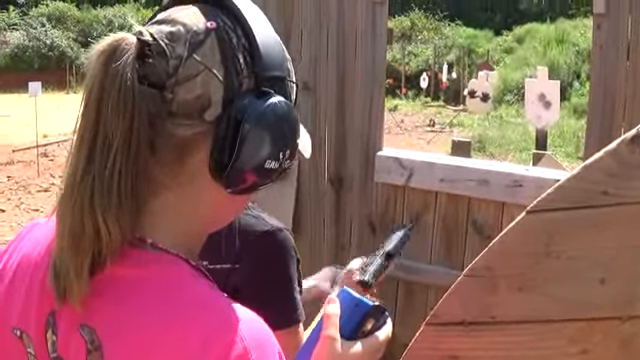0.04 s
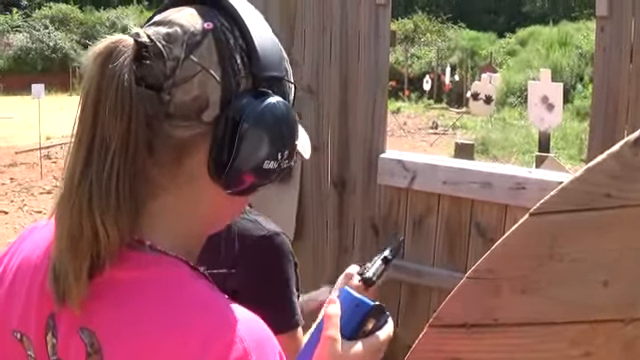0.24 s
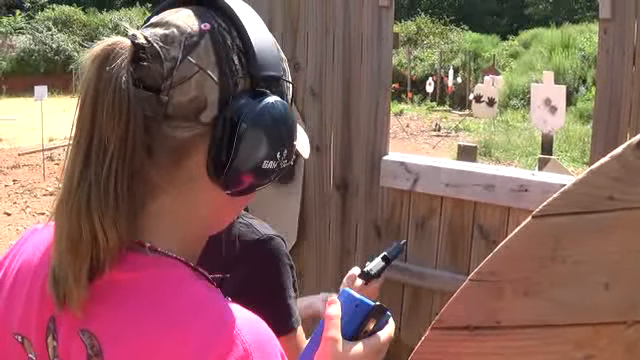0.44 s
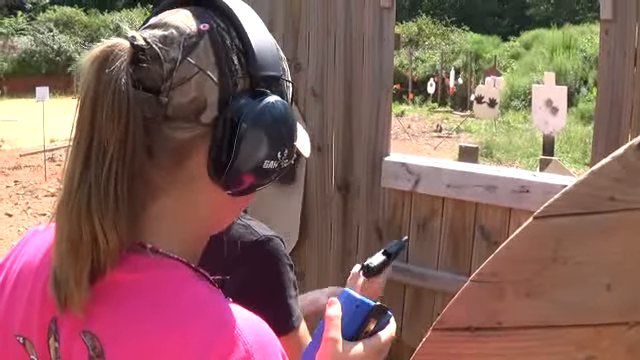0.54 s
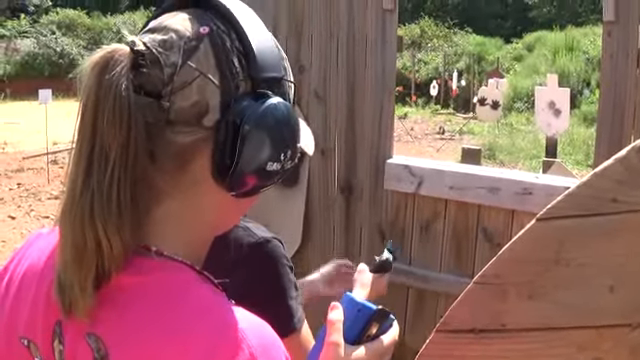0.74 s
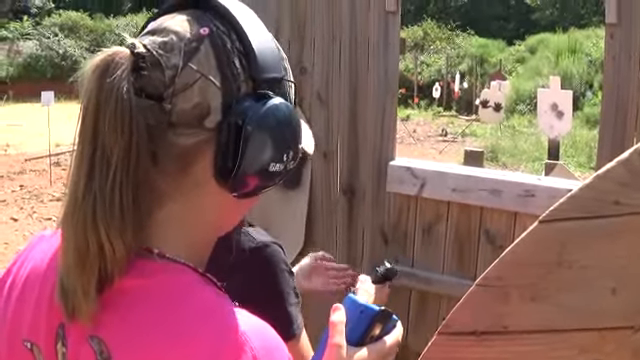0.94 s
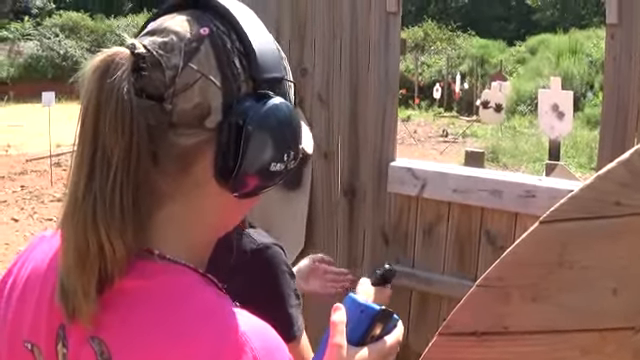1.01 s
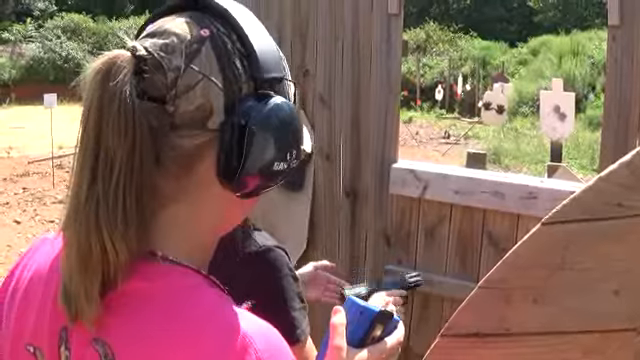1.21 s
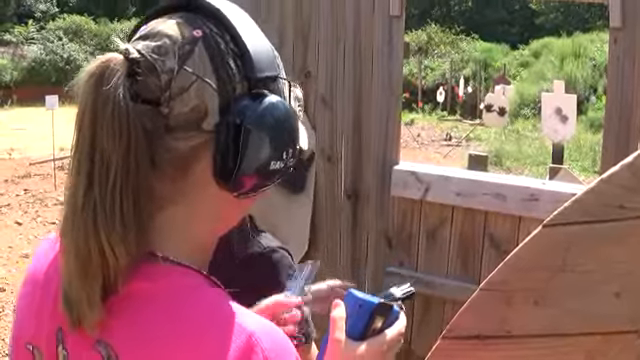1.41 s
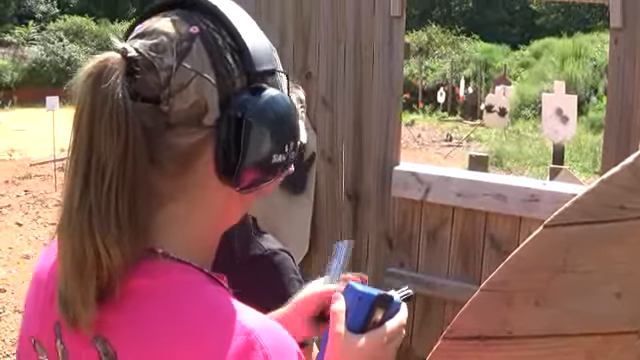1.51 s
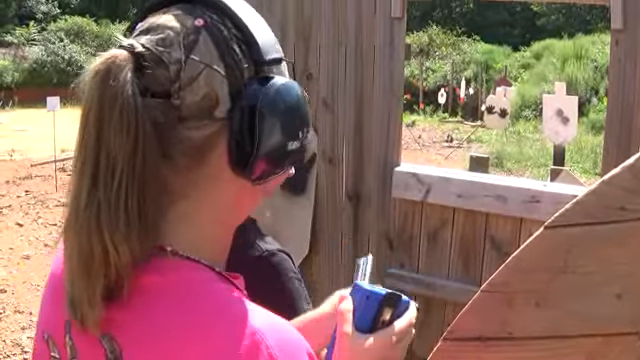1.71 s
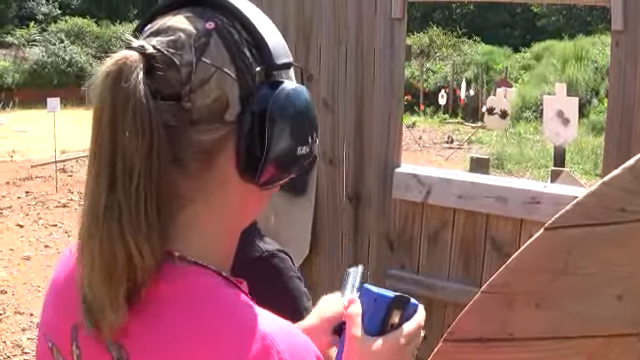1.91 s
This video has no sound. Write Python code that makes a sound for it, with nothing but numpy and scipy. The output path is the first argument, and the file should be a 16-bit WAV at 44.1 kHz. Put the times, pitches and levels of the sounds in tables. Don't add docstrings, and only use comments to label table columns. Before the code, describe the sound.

A pistol's action snaps shut at about 0.2 seconds: a tight cluster of steel clicks with a hollow knock, lasting under 0.05 seconds, then a short scattered reflection from wooden planks. Quiet summer air, steady insect hiss and rustling leaves continue, with a faint low engine hum swelling around 0.3 to 0.6 and soft wind bumps near 0.9 and 1.9. Very faint handling taps come at 1.35, 1.57 and 1.8.

```python
import sys
import numpy as np
from scipy import signal
from scipy.fft import rfft, irfft
from scipy.io import wavfile
from scipy.ndimage import uniform_filter1d

SR = 44100
rng = np.random.default_rng(int(sys.argv[2]) if len(sys.argv) > 2 else 0)


def volts(x):
    e = np.asarray(x, float) / 20
    return 10 ** e


def dump_mix(stems):
    frames = np.atleast_2d(stems).T
    limited = np.clip(frames, -1, 1)
    pcm = np.round(limited * 32767).astype(np.int16)
    wavfile.write(sys.argv[1], SR, pcm)


N = 85995


def evened(x):
    return x / np.sqrt(np.mean(x ** 2) + 1e-20)


def read(points, hz):
    f, value = np.transpose(points)
    return np.interp(np.log(hz + 1), np.log(f + 1), value)


def colour(x, points):
    hz = np.fft.rfftfreq(x.shape[-1], 1 / SR)
    return irfft(rfft(x) * volts(read(points, hz)), x.shape[-1])


def add(mix, s, sound):
    part = mix[round(s * SR):][:len(sound)]
    part += sound[:len(part)]


def ring(modes, spread_db=0., scatter=0.):
    t = np.arange(8000) / SR
    hz, db, t60 = np.transpose(modes)[:, :, None]
    db = db + spread_db * rng.standard_normal(db.shape)
    phase = scatter * 2 * np.pi * rng.random(db.shape)
    fade = volts(db - 60 * t / np.maximum(t60, .002))
    return (fade * np.sin(2 * np.pi * hz * t + phase)).sum(0)


def brighter(db, hz, bright_db):
    return db + bright_db * np.log2(hz / 4300)


# f/Hz, level/dB, time to fall by 60 dB/s
STEEL_MODES = [(1080, -6.5, 0.031), (1410, -8.5, 0.024), (1773, -12, 0.032), (2433, 0, 0.026),
               (2623, -5, 0.041), (2838, -7, 0.12), (2910, -2.5, 0.038), (3270, -3, 0.026),
               (4085, -4, 0.033), (4640, -5.5, 0.024), (5380, -4, 0.016), (7010, -3, 0.013),
               (8630, -9, 0.016), (10580, -11, 0.0089)]


def steel_ring(bright_db):
    modes = []
    for hz, db, t60 in STEEL_MODES:
        detuned_hz = hz * (1 + .03 * rng.standard_normal())
        modes.append((detuned_hz, brighter(db, hz, bright_db), t60))
    rise = np.minimum(np.arange(8000) / (.0003 * SR), 1)
    return ring(modes, spread_db=3.0, scatter=0.94) * rise


# f/Hz, level/dB
CRACK_TONE = [(200, -34), (450, -33), (1050, -5), (2900, 2.5), (4500, 1), (9000, -4.5), (12500, -9),
              (14000, -36)]


def crack(db, t60, bright_db=0):
    t = np.arange(2000) / SR
    tone = [(hz, brighter(level, hz, bright_db)) for hz, level in CRACK_TONE]
    return colour(rng.standard_normal(len(t)), tone) * volts(db - 60 * t / t60)


# t/s, level/dB, brightness/dB per octave
STRIKES = [(.2131, -38, -3), (.2150, -23, -3), (.2174, -24, 0), (.2205, -16, 2), (.2212, -12, 2),
           (.2220, -15, -1), (.2243, -17, -1), (.2271, -18, 0), (.2286, -17, -1), (.2321, -16, 2),
           (.2332, -16, 1), (.2352, -19, 1), (.2392, -22, 0), (.2442, -23, -1), (.2510, -26, -1),
           (.2582, -24, -2), (.318, -42, 3)]


def steel_strikes():
    out = np.zeros(N)
    for s, db, bright_db in STRIKES:
        add(out, s, volts(db - 13) * steel_ring(bright_db))
        add(out, s, volts(db) * crack(1.5, .014, bright_db))
    return out


# f/Hz, level/dB, time to fall by 60 dB/s
FRAME_MODES = [(338, -31, 0.16), (710, -1, 0.0043), (580, -28, 0.056), (750, -31, 0.048),
               (1700, -10.5, 0.0034)]


def frame_knock():
    out = np.zeros(N)
    knock_s, pull_s = .21565, .0005
    knock_db, pull_db = -8, -6
    add(out, knock_s, volts(knock_db) * ring(FRAME_MODES))
    add(out, knock_s - pull_s, -volts(knock_db + pull_db) * ring(FRAME_MODES))
    return out


# t/s, level/dB, f/Hz, time to fall by 60 dB/s
TAPS = [
    (1.346, -41, 2300, .018),
    (1.347, -42, 3600, .012),
    (1.571, -43, 2930, .032),
    (1.468, -47, 1700, .012),
    (1.815, -46, 1500, .02),
    (1.852, -50, 3750, .025),
]


def handling_taps():
    out = np.zeros(N)
    for s, db, hz, t60 in TAPS:
        note = ring([(hz, 0, t60)])[:2000]
        add(out, s, volts(db) * (note + crack(-3, .03)))
    return out


def pistol():
    out = steel_strikes() + frame_knock() + handling_taps()
    return signal.sosfilt(signal.butter(4, [150, 13500], "band", fs=SR, output="sos"), out)


# f/Hz, time to fall by 60 dB/s
BOOTH_FADE = [(250, 0.15), (700, 0.22), (2500, 0.17), (5000, 0.13), (12000, 0.13)]
# f/Hz, level/dB
BOOTH_SIDE = [(200, -36), (700, -13.5), (2500, -9), (4500, -10), (7000, -5), (12000, -39)]


def booth(x):
    taps = np.zeros((2, 22000))
    at = np.arange(0, 21980, 20) + rng.integers(0, 20, (2, 1099))
    np.put_along_axis(taps, at, rng.choice([-1., 1.], at.shape), 1)
    hz, t, z = signal.stft(taps, SR, nperseg=256)
    fade = volts(-60 * t / read(BOOTH_FADE, hz)[:, None])
    tail = signal.istft(z * fade, SR, nperseg=256)[1]
    tail = tail / np.linalg.norm(tail[0])
    tail = np.pad(tail, ((0, 0), (round(.003 * SR), 0)))
    wet = signal.fftconvolve(x[None], tail, axes=1)[:, :N]
    return np.array([volts(-7) * wet[0], colour(wet[1], BOOTH_SIDE)])


# f/Hz, level/dB
AIR = [(30, -3), (55, -5), (200, -2), (500, -7.5), (3000, -11), (5300, -17), (13000, -16.5), (15300, -29)]
# f/Hz, level/dB
WIDE = [(60, -24), (130, -17.5), (290, -9), (640, -4.5), (1400, -5), (3090, -5), (6800, -6.5),
        (15000, -8.5)]
# t/s, level/dB
LEAVES = [
    (0, -24),
    (.9, -18.5),
    (1.3, -23),
    (1.95, -75),
]


def outdoors():
    frames, hz = N // 256 + 5, np.fft.rfftfreq(1024, 1 / SR)[:, None]
    a, b, c, d, patches = rng.standard_normal((frames, 513, 5)).T
    patches = uniform_filter1d(patches, size=10, axis=0)
    patches = evened(uniform_filter1d(patches, size=12, axis=1))
    t = np.arange(frames) * 256 / SR

    insect_lo_hz, insect_hi_hz, insect_edge_hz = 6660, 8300, 285
    above_low = 1 / (1 + np.exp((insect_lo_hz - hz) / insect_edge_hz * 2))
    below_high = 1 / (1 + np.exp((hz - insect_hi_hz) / insect_edge_hz))
    insects = volts(-7) * above_low * below_high

    leaves_hz, leaves_octaves = 11700, 0.9
    leaf_tone = np.exp(-(np.log2((hz + 1) / leaves_hz) / leaves_octaves) ** 2)
    leaves = volts(np.interp(t, *np.transpose(LEAVES))) * leaf_tone

    size = np.sqrt(volts(read(AIR, hz)) ** 2 + insects ** 2 + leaves ** 2) * volts(0.55 * patches)
    z = np.array([a + 1j * b, (c + 1j * d) * volts(read(WIDE, hz))]) * size
    both = signal.istft(z, nperseg=1024, noverlap=768)[1][:, :N]
    return volts(-47) * both / np.std(both[0])


# t/s, level/dB
DRONE = [
    (0, -61),
    (.2, -73),
    (.32, -49.5),
    (.45, -65),
    (.58, -54.5),
    (.8, -63),
    (1, -74),
    (1.95, -87),
]


def drone():
    note_hz, width_hz = 186, 18
    r = np.exp(-np.pi * width_hz / SR)
    slow = signal.lfilter([1 - r], [1, -r], rng.standard_normal(N) + 1j * rng.standard_normal(N))
    t = np.arange(N) / SR
    hum = evened((slow * np.exp(2j * np.pi * note_hz * t)).real)
    return volts(np.interp(t, *np.transpose(DRONE))) * hum


# t/s, length/s, f/Hz, level/dB
BUMPS = [
    (0.87, 0.15, 57, -53.5),
    (1.86, 0.076, 97, -52),
    (1.62, 0.079, 390, -56),
    (1.05, 0.042, 430, -53),
]


def wind():
    out = np.zeros(N)
    for s, length, hz, db in BUMPS:
        t = np.arange(0, length, 1 / SR)
        swell = np.sin(np.pi * t / length) ** 2
        add(out, s, volts(db) * swell * np.sin(2 * np.pi * hz * t))
    return out


def scene():
    gun = pistol()
    mid, side = outdoors() + booth(gun)
    mid = mid + gun + drone() + wind()
    side = side - 0.029 * mid
    return np.array([mid + side, mid - side])


def roll_off(x):
    return signal.sosfilt(signal.butter(12, 15400, fs=SR, output="sos"), x)


# t/s, f/Hz
FOLD = [(0, 13000), (.13, 4200), (.24, 4800), (.35, 12500), (.6, 9500), (.71, 13500), (.79, 4200),
        (.88, 8200), (.94, 4200), (1.03, 4200), (1.11, 9500), (1.19, 4200), (1.3, 8500), (1.39, 13000),
        (1.48, 4300), (1.57, 12500), (1.8, 10500), (1.95, 12500)]


def record(dry):
    mid, side = (dry[0] + dry[1]) / 2, (dry[0] - dry[1]) / 2
    hz, t, z = signal.stft(side, SR, nperseg=2048, noverlap=1024)
    top_hz = np.interp(t, *np.transpose(FOLD)) * (1 + .2 * rng.standard_normal(len(t)))
    side = signal.istft(z * (hz[:, None] < top_hz), SR, nperseg=2048, noverlap=1024)[1][:N]
    x = np.array([mid + side, mid - side])
    treble_cut = signal.firwin(511, 15300, window=("kaiser", 9), fs=SR)
    x = signal.oaconvolve(x, treble_cut[None], "same")
    return roll_off(x)


dry = scene()
out = record(dry)
dump_mix(out)
```